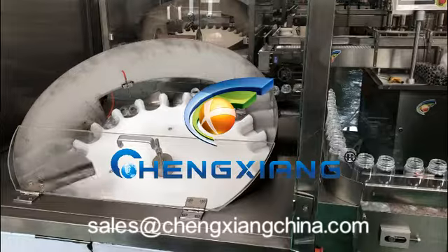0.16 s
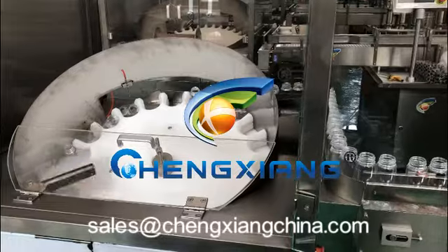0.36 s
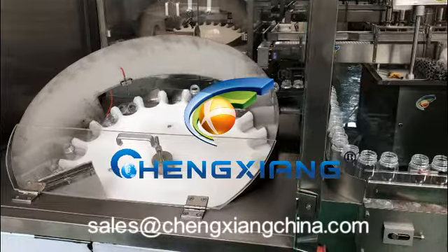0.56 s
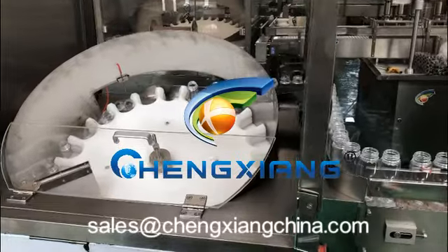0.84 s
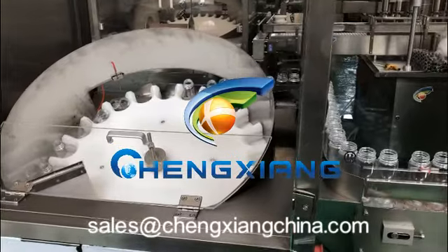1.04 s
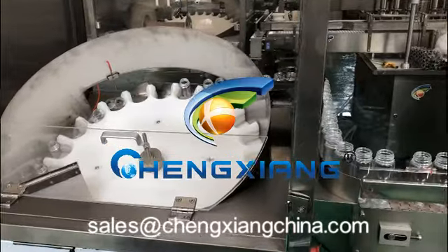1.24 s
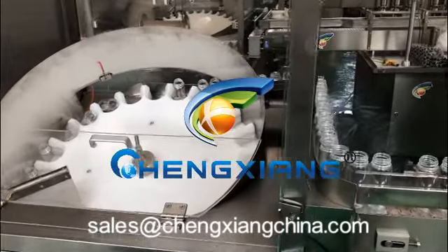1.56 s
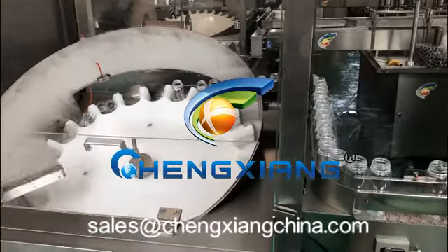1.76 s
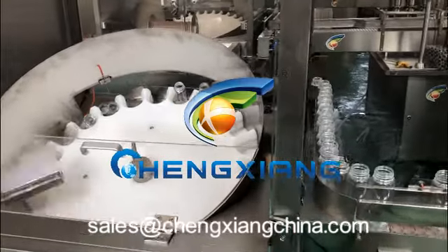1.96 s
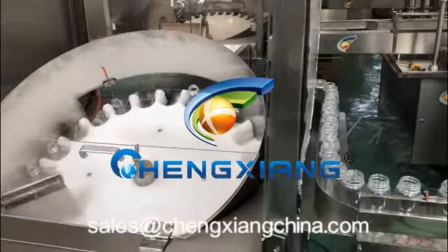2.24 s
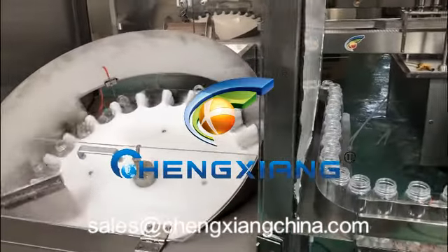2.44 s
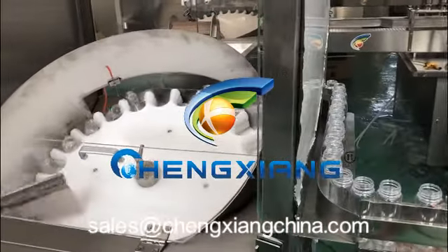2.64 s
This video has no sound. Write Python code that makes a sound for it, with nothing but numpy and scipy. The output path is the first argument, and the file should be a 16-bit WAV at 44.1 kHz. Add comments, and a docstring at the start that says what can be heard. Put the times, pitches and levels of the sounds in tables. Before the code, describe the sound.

Close up, a bottle sorting machine knocks and tumbles plastic bottles in its steel housing. Compressed air hisses, puffs briefly, pauses, then hisses again in quick spurts, while conveyors and motors drone through the factory.

```python
"""Bottle sorting machine, up close

The sound cuts in abruptly on a factory hall. Plastic bottles knock against a ringing sheet-steel
housing, rub and tumble, and small steel parts clink. An air nozzle hisses on and off and valves vent
short blasts. Underneath lies a bed of conveyor din and humming motors."""
import sys
import numpy as np
from scipy import signal
from scipy.fft import rfft, irfft
from scipy.io import wavfile

SR = 44100
rng = np.random.default_rng(int(sys.argv[2]) if len(sys.argv) > 2 else 0)


def master(y):
    """Save y as 16-bit WAV."""
    cut = np.clip(np.atleast_2d(y).T, -1, 1)
    pcm = np.round(cut * 32767)  # scale
    wavfile.write(sys.argv[1], SR, pcm.astype(np.int16))


N = 123480

# Bottle hits. Each row: start in seconds, level in dB, focus in Hz, spread in octaves,
# share of ring from 0 to 1, clatter decay in seconds.
BOTTLE_HITS = [(0.2099, -16.5, 854, 2.6, 0.65, 0.012), (.218, -26, 1550, .5, 0.9, 0.013),
               (.227, -24.5, 3600, 1.7, 1, 0.008), (.2395, -15, 1040, 1.3, 0.92, 0.009),
               (.25, -28.5, 2100, 0.14, .8, .008), (.276, -21, 603, 1.7, 0.74, 0.011),
               (0.286, -23, 500, 1.7, 0.36, 0.016), (.298, -25.5, 1210, 1.8, .5, 0.024),
               (.308, -22.5, 2050, 0.27, 0.6, 0.021), (.309, -26, 965, .5, 0.6, 0.028),
               (.338, -20.5, 1510, 0.086, 0.94, 0.023), (.334, -21.5, 750, 2.3, 0.32, 0.027),
               (.405, -18, 1130, 2.1, 0.77, 0.025), (0.429, -25.5, 1300, 1, 0.46, .02),
               (.657, -27.5, 910, 0.67, 0.71, .018), (.696, -22.5, 990, 0.33, 1, 0.038),
               (.804, -21.5, 1300, 1.5, 0.66, 0.018), (.806, -21, 2080, 0.11, 0.95, 0.016),
               (.817, -25.5, 1400, 1.6, 0.93, 0.015), (0.939, -21, 530, 0.19, 0.76, 0.0088),
               (.943, -20.5, 1100, 0.16, 0.86, 0.008), (0.967, -27, 506, 0.19, 0.64, 0.01),
               (1.157, -30, 131, 0.42, .02, 0.012), (1.832, -30, 270, 0.54, 0.28, 0.032),
               (2.187, -35.5, 229, 0.43, 0.19, 0.046), (2.305, -28, 1560, .1, 0.98, .02),
               (2.33, -27, 280, 0.6, 0.41, 0.031), (2.355, -26.5, 1100, 1.5, 0.46, 0.031),
               (2.398, -26.5, 840, 0.17, .9, .015), (2.43, -33, 860, 0.18, 0.55, 0.014),
               (2.472, -30, 790, 0.32, .8, 0.014), (2.546, -28, 533, 0.34, 0.5, 0.039),
               (2.678, -27.5, 1110, 0.47, 0.5, 0.029)]
# The ring of the steel housing. Each row: pitch in Hz, relative level in dB, T60 in seconds.
HOUSING_MODES = [(320, -1.5, 0.084), (562, -11, 0.061), (638, -7, 0.054), (751, -8.5, .16), (843, -6, 0.13),
                 (976, -2.5, .08), (1088, -14.5, 0.13), (1314, -5, 0.057), (1522, -6, 0.16),
                 (1639, -2.5, 0.094), (2094, -7.5, 0.13), (3120, -11, 0.064), (3710, 4, 0.052),
                 (3740, -2, .05)]
# The colour of a hit's clatter. Each row: frequency in Hz, relative level in dB.
CLATTER_EQ = [(60, 0), (160, -6), (320, -2.5), (900, 2), (1650, -5), (2300, -11), (3700, 0), (4600, -12),
              (8000, -14), (15000, -30)]
# Nozzle openings. Each row: start and end in seconds, level in dB, tilt in dB per octave,
# lower peak in Hz, its boost in dB, upper peak in Hz, its boost in dB, edge whistle boost in dB.
NOZZLE_CUES = [(.1, .595, -27, -1.5, 11620, 7, 13750, 0, 2),
               (1.958, 2.193, -25.7, -2, 11680, 8.5, 13530, 4, 2),
               (2.192, 2.294, -25.5, -6, 11300, 4, 13380, 5, 13),
               (2.32, 2.587, -27, 2, 11500, 6, 13500, 2.5, 2),
               (2.596, 2.9, -27, -4, 11800, 7, 13600, 7, 11)]
# The colour of the nozzle's hiss. Each row: frequency in Hz, relative level in dB.
NOZZLE_EQ = [(800, -60), (3000, -9), (4200, -5), (5200, -6.5), (7500, -2), (10000, -.5), (12700, 0.5),
             (14200, 3), (14900, -2), (15700, 1.5)]
# Valve blasts. Each row: start in seconds, level in dB, attack, hold and decay in seconds,
# focus in Hz, spread in octaves.
VALVE_CUES = [(0.83, -24, .002, .004, .012, 15000, 0.34), (0.842, -18.5, 0.002, 0.0043, 0.018, 11000, 2.9),
              (0.863, -20, .005, 0.01, 0.094, 11100, 3.7), (0.894, -26.5, .01, .035, 0.015, 6000, 1.4),
              (1.144, -22.5, 0.0056, 0.0047, 0.03, 8000, 3.5), (1.966, -31, .002, .01, 0.018, 13000, 1),
              (2.173, -30.5, 0.0073, 0.14, 0.053, 4940, 2.3), (2.211, -23, .005, 0.03, 0.013, 12000, 3.3),
              (2.328, -33.5, .008, 0.019, 0.023, 3000, 0.21)]
# The colour of the vented air. Each row: frequency in Hz, relative level in dB.
EXHAUST_EQ = [(300, 2.5), (2500, -8), (3600, -0.5), (4300, -2.5), (5100, 0), (7300, -4), (12000, 0),
              (14000, -1), (15600, -7)]
# Exhaust port resonances. Each row: centre in Hz, width in Hz, boost in dB.
PORT_PEAKS = [(6100, 520, 4), (7500, 300, 4.5), (9240, 880, 3.5), (15200, 600, 5)]
# Bottles tumbling. Each row: start and end in seconds, level in dB.
TUMBLE_CUES = [(.15, .72, -44), (0.942, 1.047, -35.5), (2.285, 2.57, -32)]
# The hollow colour of the tumble. Each row: frequency in Hz, relative level in dB.
TUMBLE_EQ = [(100, -6), (250, 5.5), (450, 1.5), (900, 1), (1250, -2), (1550, 0.5), (2400, -0.5), (3500, -8),
             (6000, -43), (15000, -45)]
# Rubs, one glide each. Each point: time in seconds, pitch in Hz, level in dB.
RUB_GLIDES = [
    [(.968, 880, -29), (.99, 949, -36), (1.03, 1192, -33)],
    [(2.268, 456.5, -33), (2.295, 437.6, -31), (2.33, 341, -41), (2.375, 422, -35.5)],
    [(2.485, 558, -27), (2.51, 542, -32), (2.53, 526, -44)],
    [(2.71, 397.5, -34), (2.75, 320, -36.5), (2.8, 455, -35)],
]
# Steel clinks. Each row: start in seconds, level in dB, focus in Hz, spread in octaves.
CLINK_CUES = [(1.831, -30, 5560, 0.48), (1.965, -35, 4170, 0.15)]
# The ring of the small parts. Each row: pitch in Hz, relative level in dB, T60 in seconds.
PART_MODES = [(4200, 1, 0.18), (4550, -8, 0.18), (4576, -9, .16), (4900, 4, 0.12), (5669, -8, .12),
              (7407, -1, .12), (8000, -2, .16)]
# The colour of the conveyor din. Each row: frequency in Hz, relative level in dB.
DIN_EQ = [(22, -32), (60, -11.5), (130, -2.5), (270, -3), (520, 0.5), (720, -2), (1000, 1), (1600, 0.5),
          (1900, -2), (2800, -5.5), (5000, -8), (8000, -9), (12000, -9.5), (13700, -5.5), (15600, -6)]
# Resonances in the din. Each row: centre in Hz, width in Hz, boost in dB.
DIN_RESONANCES = [(3440, 190, 2.5), (14400, 450, 1), (15020, 220, 4)]
# The conveyor's midrange level over time. Each row: time in seconds, gain in dB.
MID_LEVEL = [(.2, 3), (.75, 2), (1.1, 0.5), (1.6, 0.7), (1.8, 0.5), (2.05, -3), (2.2, 0.5), (2.4, .5),
             (2.8, -0.5)]
# Motor and mains tones. Each row: pitch in Hz, level in dB, waver depth as a fraction.
MOTOR_TONES = [(49.8, -48, 0.19), (99.1, -47.5, 0.22), (400.6, -44.5, 0.15), (545, -49, 0.28),
               (1634, -58, 1)]

RING_DB, RING_RISE_S = 2, 0.0046
CLATTER_DB, CONTACT_S, CRACK_DB, CRACK_S = 1, 0.0071, -6, 0.0033
JET_ATTACK_S, JET_RELEASE_S = .004, .025
JET_WIDTH_HZ, EDGE_HZ, EDGE_WIDTH_HZ = 590, 15580, 530
TUMBLE_RISE_S, TUMBLE_FALL_S = 0.019, 0.15
RUB_JITTER, RUB_FLUTTER_DB = 0.019, 0.5
TICK_DB, TICK_S = 2.5, 0.029
DIN_DB, MID_LOW_HZ, MID_HIGH_HZ = -25.5, 200, 2440
HOUSING_DECAY_S, HOUSING_DB = .004, -8.5
HALL_T60_S, HALL_DB = 0.76, -22.5
CUT_IN_S, TOP_HZ = .2102, 15800


def bottle_knocks():
    """Each hit cracks, clatters and rings the housing; where it lands decides which modes speak."""
    out, body = np.zeros(N), curve(CLATTER_EQ)
    for start, db, focus_hz, spread, ring_share, decay in BOTTLE_HITS:
        contact = envelope(start, 0.0011, CONTACT_S, decay)
        crack = undb(CRACK_DB) * envelope(start, 0.00052, 0, CRACK_S)
        clatter = undb(CLATTER_DB) * noise(body + focus(freqs(), focus_hz, spread)) * (contact + crack)
        steel = undb(RING_DB) * ring(HOUSING_MODES, start, focus_hz, spread)
        out += undb(db) * (np.sqrt(ring_share) * steel + np.sqrt(1 - ring_share) * clatter)
    return out


def air_nozzle():
    """A switched air jet flutters; its three hissing resonances change from one opening to the next."""
    hiss = np.zeros(N)
    for start, end, db, tilt, low_hz, low_db, high_hz, high_db, edge_db in NOZZLE_CUES:
        peaks = resonances([(low_hz, JET_WIDTH_HZ, low_db), (high_hz, JET_WIDTH_HZ, high_db),
                            (EDGE_HZ, EDGE_WIDTH_HZ, edge_db)])
        jet = noise(curve(NOZZLE_EQ) + peaks + tilt * np.log2(freqs()))
        hiss += undb(db) * jet * envelope(start, JET_ATTACK_S, end - start, JET_RELEASE_S)
    return hiss * undb(1.43 * drift(27))


def valve_blasts():
    """Compressed air vents suddenly and dies away as the pressure drops; each outlet has its colour."""
    air, exhaust = np.zeros(N), curve(EXHAUST_EQ) + resonances(PORT_PEAKS)
    for start, db, attack, hold, decay, focus_hz, spread in VALVE_CUES:
        blast = noise(exhaust + focus(freqs(), focus_hz, spread))
        air += undb(db) * blast * envelope(start, attack, hold, decay)
    return air * undb(0.14 * drift(93))


def bottle_tumble():
    """Empty bottles roll over one another: a dense patter of short hollow bursts."""
    impacts = grains(per_second=700, spread_db=1.5) ** 2
    energy = signal.lfilter([1], [1, -np.exp(-1 / (0.0046 * SR))], impacts)  # a short tail on each
    patter = colour(np.sqrt(energy) * rng.standard_normal(N), curve(TUMBLE_EQ))
    swells = sum(undb(db) * envelope(start, TUMBLE_RISE_S, end - start - TUMBLE_RISE_S, TUMBLE_FALL_S)
                 for start, end, db in TUMBLE_CUES)
    return patter * swells


def bottle_rubs():
    """A bottle rubs along a guide: a hollow, unsteady tone that slides in pitch."""
    out, t = np.zeros(N), times()
    for glide in RUB_GLIDES:
        at, hz, db = np.array(glide).T
        pitch = np.interp(t, at, hz) * (1 + RUB_JITTER * drift(79))
        tone = np.sqrt(2) * np.sin(2 * np.pi * np.cumsum(pitch) / SR)
        gate = envelope(at[0], 0.007, at[-1] - at[0] - .008, 0.0083)
        out += tone * undb(np.interp(t, at, db)) * gate
    return out * undb(RUB_FLUTTER_DB * drift(40))


def steel_clinks():
    """Small steel parts touch: a tick and a thin ring."""
    out = np.zeros(N)
    for start, db, focus_hz, spread in CLINK_CUES:
        ping = ring(PART_MODES, start, focus_hz, spread)
        tick = noise(focus(freqs(), focus_hz, spread)) * envelope(start, .001, 0, TICK_S)
        out += undb(db) * (ping + undb(TICK_DB) * tick)
    return out


def conveyor_din():
    """Conveyors and other machines: a wavering wash with fine rattle; its midrange swells and eases."""
    wash = noise(curve(DIN_EQ) + resonances(DIN_RESONANCES)) * undb(0.78 * drift(13))
    rattle = colour(grains(per_second=1800, spread_db=3.0), curve(DIN_EQ))
    bed = undb(DIN_DB) * (wash + undb(-12.5) * rattle)
    mids = irfft(rfft(bed) / (1 + (MID_LOW_HZ / freqs()) ** 2 + (freqs() / MID_HIGH_HZ) ** 2), N)
    ride = undb(np.interp(times(), *np.array(MID_LEVEL).T))
    return bed + mids * (ride - 1)


def motor_hum():
    """Mains hum and drive whine, wavering in level and phase."""
    hum = np.zeros(N)
    for hz, db, depth in MOTOR_TONES:
        waver = 1 + depth * (drift(11) + 1j * drift(18))
        tone = np.exp(2j * np.pi * (hz * times() + rng.random()))
        hum += undb(db) * np.sqrt(2) * np.real(waver * tone)
    return hum


def housing_reflections(x):
    """Quick reflections between the steel panels comb the hiss."""
    return reverb(x, envelope(0.00097, 0.0027, 0, HOUSING_DECAY_S), HOUSING_DB)


def hall_echo(x):
    """The diffuse tail of the factory hall."""
    return reverb(x, envelope(0.026, 0.0061, 0, HALL_T60_S / np.log(1000)), HALL_DB)


def reverb(x, shape, wet_db):
    """The dry sound plus a tail of shaped noise."""
    tail = rng.standard_normal(N) * shape
    return x + undb(wet_db) * signal.fftconvolve(x, tail / np.sqrt(np.sum(tail ** 2)))[:N]


def ring(table, start, focus_hz, spread):
    """Struck modes, slightly detuned on each hit; those near the focus are favoured."""
    t = times()[:SR // 2]
    hz, mode_db, t60 = np.array(table).T[:, :, None]
    detune, phase = rng.standard_normal((2, len(table), 1))
    gains = undb(mode_db + focus(hz, focus_hz, spread))
    tones = np.sin(2 * np.pi * (hz * (1 + 0.0081 * detune) * t + phase))
    modes = gains * tones * np.exp(-np.log(1000) * t / t60)
    strike = modes.sum(0) * np.sqrt(2 / np.sum(gains ** 2))
    placed = np.pad(strike, (int(start * SR), N))[:N]
    return placed * np.clip((times() - start) / RING_RISE_S, 0, 1)


def envelope(start, attack, hold, decay):
    """Linear rise, hold, exponential fall, all in seconds."""
    t = times() - start
    rise = np.clip(t / max(attack, 1e-4), 0, 1)
    return rise * np.exp(-np.maximum(t - attack - hold, 0) / max(decay, 1e-3))


def grains(per_second, spread_db):
    """Random tiny impacts of very unequal size."""
    impacts = (rng.random(N) < per_second / SR) * rng.standard_normal(N)
    return impacts * undb(spread_db * np.minimum(rng.exponential(size=N), 4))


def drift(hz):
    """Smooth random modulation, mostly slower than hz, at RMS 1."""
    return noise(-10 * np.log10(1 + (freqs() / hz) ** 4))


def noise(eq_db):
    return colour(rng.standard_normal(N), eq_db)


def colour(x, eq_db):
    """Apply an EQ and normalise to RMS 1."""
    shaped = irfft(rfft(x) * undb(eq_db), N)
    return shaped / np.sqrt(np.mean(shaped ** 2) + 1e-20)


def curve(points):
    """An EQ in dB drawn through the points."""
    hz, db = np.array(points).T
    return np.interp(np.log(freqs()), np.log(hz), db)


def focus(hz, centre_hz, spread):
    """An EQ hump, 6 dB down at spread octaves either side."""
    return -20 * np.log10(1 + (np.log2(hz / centre_hz) / spread) ** 2)


def resonances(peaks):
    """Bell-shaped EQ boosts in dB."""
    return sum(db / (1 + (2 * (freqs() - hz) / width) ** 2) for hz, width, db in peaks)


def undb(db):
    return 10 ** (np.asarray(db) / 20)


def times():
    return np.arange(N) / SR


def freqs():
    return np.maximum(np.arange(N // 2 + 1) * SR / N, 1)


def scene():
    """Bed, air and bottle action, mixed dead centre."""
    bed = conveyor_din() + motor_hum()
    air = housing_reflections(air_nozzle() + valve_blasts())
    action = bottle_tumble() + hall_echo(bottle_knocks() + steel_clinks() + bottle_rubs())
    mix = bed + air + action
    return np.array([mix, mix])


def record(dry):
    """A hard cut in, and a steep low-pass on the very top."""
    gate = np.clip((times() - CUT_IN_S) / .001, 0, 1)
    lowpass = signal.ellip(12, .1, 90, TOP_HZ, fs=SR, output="sos")
    return signal.sosfilt(lowpass, dry * gate)


dry = scene()
out = record(dry)
master(out)
```